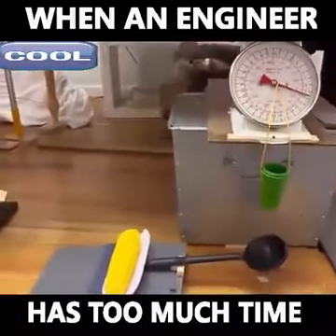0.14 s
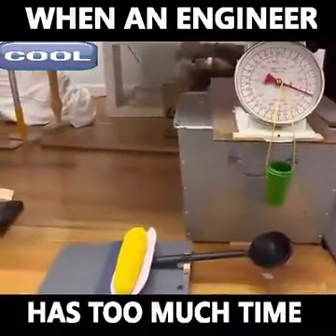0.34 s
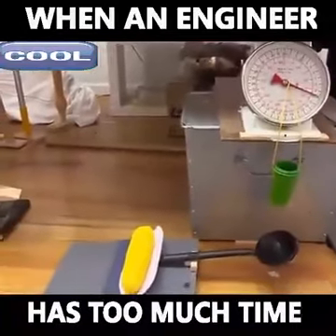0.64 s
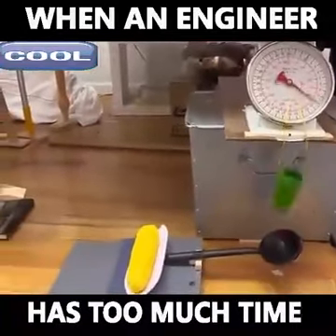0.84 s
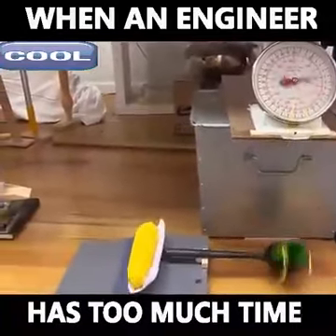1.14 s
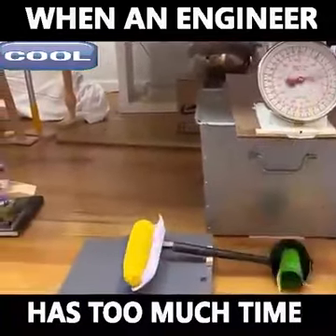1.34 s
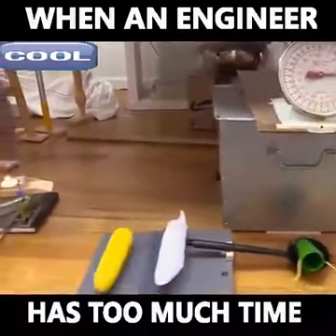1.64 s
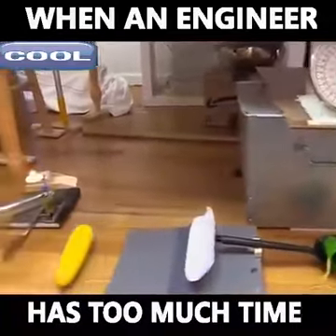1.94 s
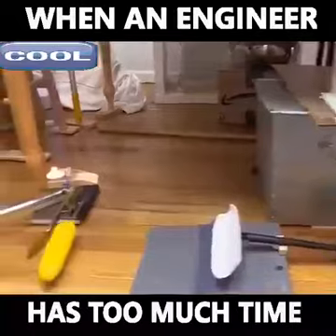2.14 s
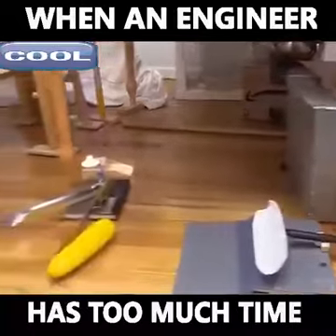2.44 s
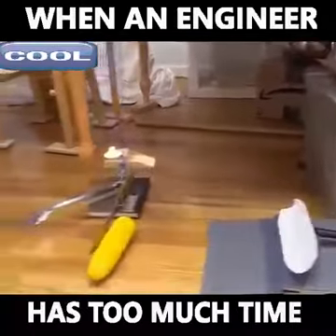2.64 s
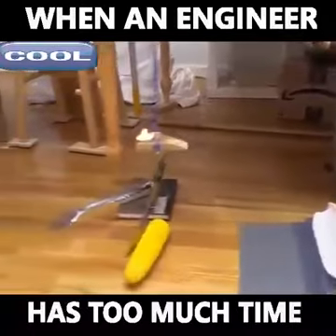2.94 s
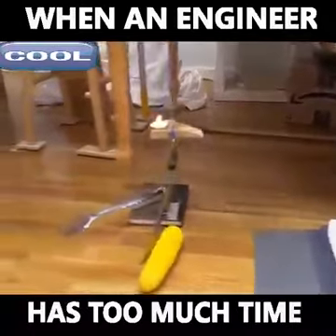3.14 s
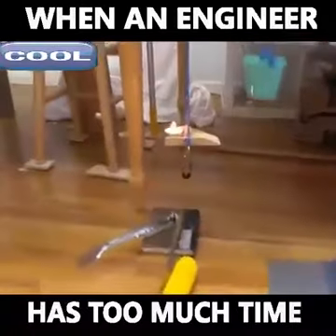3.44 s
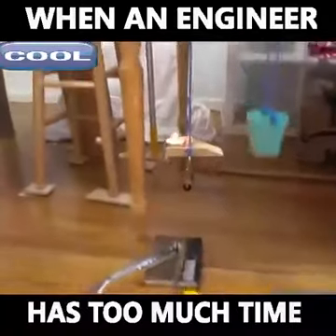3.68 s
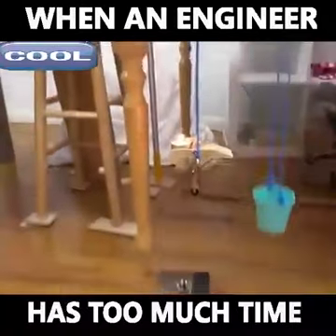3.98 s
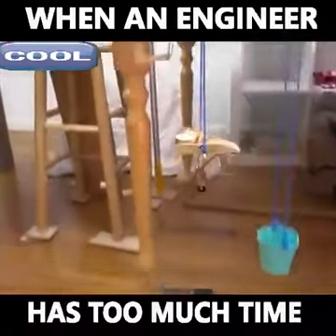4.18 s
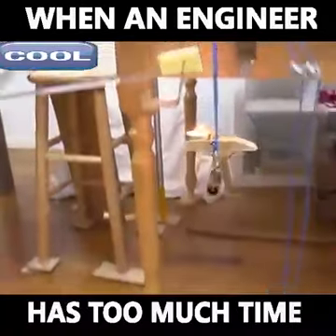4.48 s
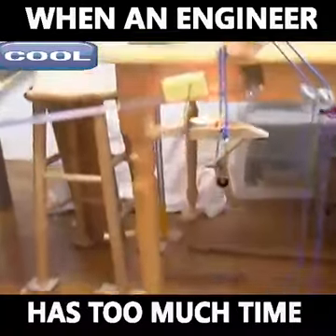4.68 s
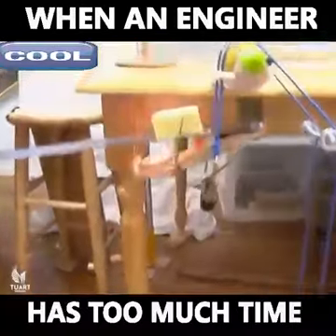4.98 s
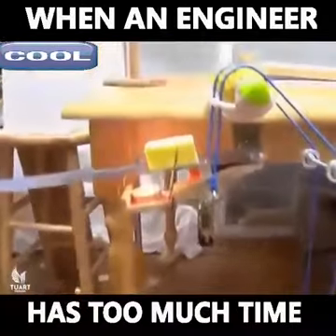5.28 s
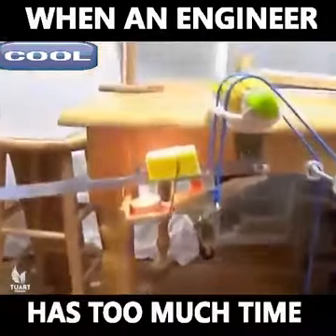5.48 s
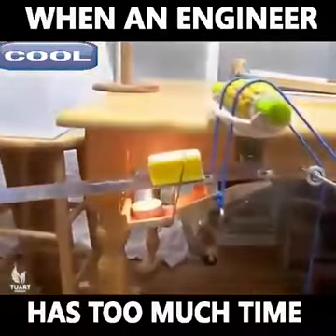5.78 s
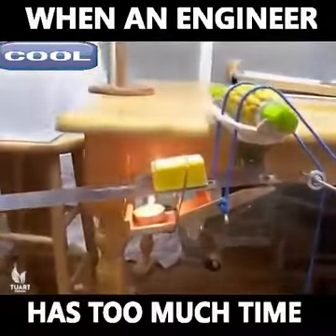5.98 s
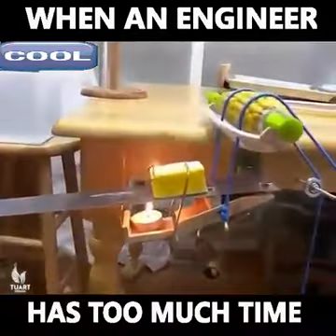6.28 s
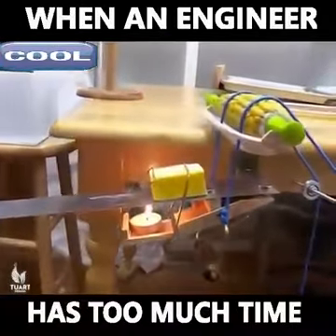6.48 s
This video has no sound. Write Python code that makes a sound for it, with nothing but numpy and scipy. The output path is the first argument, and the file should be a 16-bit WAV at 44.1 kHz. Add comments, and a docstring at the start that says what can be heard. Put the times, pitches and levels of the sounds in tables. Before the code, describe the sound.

Water trickles and glugs between sharp clatters, knocks and rolling thumps as a chain of homemade contraptions runs in a wooden-floored room.

```python
"""A wooden-floored room, where a chain of homemade contraptions runs over building rumble and faint hiss.
Water glugs and trickles into a vessel by bubble resonance; small parts tick and glass clinks. A plastic
cup drops into a ladle, a lever clatters, a corn cob rolls thumping over the boards and trips metal tongs;
later a wooden arm slams against a table. Each impact excites the damped normal modes of what it strikes."""
import sys
import numpy as np
from scipy import signal
from scipy.fft import rfft, irfft, next_fast_len
from scipy.io import wavfile

SR = 44100
rng = np.random.default_rng(int(sys.argv[2]) if len(sys.argv) > 2 else 0)


def unload_wav(signal):
    """Save mono or channel-first audio to the path in sys.argv[1] as 16-bit WAV at rate SR, clipped to [-1, 1]."""
    wavfile.write(
        sys.argv[1],
        SR,
        np.round(np.clip(np.atleast_2d(signal).T, -1, 1) * 32767).astype(np.int16),
    )


N = 291926
TIME = np.arange(N) / SR


def from_db(db):
    """Amplitude ratio of a level in decibels."""
    return 10 ** (np.asarray(db) / 20)


def unit_rms(x):
    """Normalisation to unit mean power."""
    return x / np.sqrt(np.mean(x ** 2) + 1e-20)


def in_time(rows):
    """Linear interpolation of each column at every sample."""
    times, *columns = np.transpose(rows)
    return [np.interp(TIME, times, column) for column in columns]


def at_hz(points, hz):
    """Interpolation on a logarithmic frequency axis."""
    freqs, values = np.transpose(points)
    return np.interp(np.log(np.maximum(hz, 1)), np.log(freqs), values)


def colour(x, spectrum):
    """Zero-phase filtering by a curve of f/Hz, gain/dB."""
    size = next_fast_len(x.shape[-1])
    gain = from_db(at_hz(spectrum, np.fft.rfftfreq(size, 1 / SR)))
    return irfft(rfft(x, size) * gain, size)[..., :x.shape[-1]]


def band(x, low_hz, high_hz):
    """Causal band-pass filtering."""
    return signal.sosfilt(signal.butter(2, [low_hz, high_hz], "band", fs=SR, output="sos"), x)


def ring(x, hz, t60):
    """Damped harmonic oscillator: its impulse response is a decaying unit sine."""
    r, w = from_db(-60 / (t60 * SR)), 2 * np.pi * hz / SR
    return signal.lfilter([0, np.sin(w)], [1, -2 * r * np.cos(w), r * r], x + 1e-18)


def add(track, onset, sound):
    """Superposition of a sound at an onset in seconds."""
    at = round(onset * SR)
    track[at:at + len(sound)] += sound[:max(N - at, 0)]


# the only stretch in which the ears differ: start t/s, end t/s
WIDE_SPAN = (1.25, 3.02)
# left-right difference of diffuse sound: f/Hz, gain/dB
SIDE_SPECTRUM = [(100, -42), (300, -48.5), (700, -4), (2000, -4), (8000, -3)]
def spread(side):
    """Interaural difference: a signal in antiphase at the two ears widens the sound."""
    gate = np.clip(np.minimum(TIME - WIDE_SPAN[0], WIDE_SPAN[1] - TIME) / 0.0079, 0, 1)
    return gate * colour(side, SIDE_SPECTRUM) * [[1], [-1]]


# spectral densities of rumble and hiss: f/Hz, relative level/dB
RUMBLE_SPECTRUM = [(8.8, -33.5), (15, 6.5), (33, -0.5), (54, 1.5), (64, -4.5), (130, -19.5), (170, -53.5),
                   (290, -120)]
HISS_SPECTRUM = [(53, -37.5), (90, -0.5), (318, -5), (356, -7), (392, -10), (474, -4.5), (644, -17.5),
                 (695, -13.5), (962, -15.5), (7150, -30.5), (8660, -21.5), (11300, -78.5), (19100, -120)]
# their envelopes: t/s, level/dB
RUMBLE_ENVELOPE = [(0, -40), (1.27, -44), (1.4, -55), (1.62, -45), (1.7, -68), (2.65, -77), (2.95, -57),
                   (3.1, -32), (3.21, -43), (3.34, -33), (3.45, -44), (3.85, -35), (4.0, -40.5),
                   (4.24, -36.5), (5.75, -35), (6.2, -44), (6.62, -41.5)]
HISS_ENVELOPE = [(0, -53), (.46, -56.5), (1.27, -51), (1.4, -45.5), (1.8, -34), (2.0, -49), (2.65, -40.5),
                 (2.82, -54.5), (3.2, -47.5), (3.5, -54), (6.62, -50.5)]
def room_tone():
    """Ambient noise with a continuous spectrum: building rumble, alike in both ears, and faint hiss."""
    (rumble_db,), (hiss_db,) = in_time(RUMBLE_ENVELOPE), in_time(HISS_ENVELOPE)
    rumble = unit_rms(colour(rng.standard_normal(N), RUMBLE_SPECTRUM))
    mid, side = colour(rng.standard_normal((2, N)), HISS_SPECTRUM)
    hiss = (mid + from_db(1.5) * spread(side)) / np.std(band(mid, 130, 1000))
    return from_db(rumble_db) * rumble + from_db(hiss_db) * hiss


# reverberation time of the room: f/Hz, T60/s
ROOM_DECAY = [(100, 0.39), (1000, 0.41), (4000, 0.33), (9000, 0.11)]
def reverberation(mid_send, side_send):
    """Diffuse field: dense reflections act as noise that decays exponentially in each band."""
    t = np.arange(int(.8 * SR)) / SR
    edges_hz = 60 * 2 ** np.arange(0, 9.)
    edges_hz[-1] = 12000
    noise = rng.standard_normal((2, len(t))) * (1 - np.exp(-t / 0.0023))
    response = sum(band(noise, low, high) * from_db(-60 * t / at_hz(ROOM_DECAY, np.sqrt(low * high)))
                   for low, high in zip(edges_hz, edges_hz[1:]))
    response[1] *= 1 + 8.6 * np.exp(-t / .02)   # early reflections differ most between the ears
    response /= np.linalg.norm(response, axis=1, keepdims=True)
    mid, side = signal.fftconvolve(np.array([mid_send, side_send]), response, axes=1)[:, :N]
    return mid + spread(side)


# clinks of a glass part: t/s, level/dB, f/Hz, free ringing time/s
GLASS_CLINKS = [(0.108, -46.5, 2670, 0.19), (0.232, -34.5, 2750, 0.087), (0.798, -44, 2750, 0.083),
                (1.11, -49, 2830, 0.096)]
def glass():
    """Contact damping: one mode rings freely, then dies faster once the part is touched."""
    out, t = np.zeros(N), np.arange(SR // 2) / SR
    for onset, db, hz, free_s in GLASS_CLINKS:
        decay_db = -60 * t / 0.36 - 60 * np.maximum(t - free_s, 0) / 0.14
        attack = 1 - np.exp(-t / 0.012)
        add(out, onset, from_db(db + decay_db) * attack * np.sin(2 * np.pi * hz * t))
    return out


def spiky_noise(length, uneven_db):
    """Heavy-tailed noise: each sample takes its own random gain."""
    return rng.standard_normal(length) * from_db(uneven_db * np.minimum(rng.exponential(1, length), 4))


def rattle(t60, crack, uneven_db):
    """Contact chatter: a hard burst with one sharp impulse, then a dense, uneven decay."""
    t = np.arange(SR // 3) / SR
    contacts = spiky_noise(len(t), uneven_db)
    contacts *= from_db(2.5 * np.repeat(rng.standard_normal(len(t) // 150), 150))   # small clumps
    burst, tail = 0.7 * np.exp(-t / 0.0046), .5 * from_db(-60 * t / t60)
    attack = np.minimum(t / 0.00082, 1) ** 2
    force = unit_rms(contacts) * (burst + tail) * attack
    force[round(.002 * SR)] += crack
    return force


# ticks of small parts and splashes: t/s, level/dB, f/Hz, rattle T60/s
SMALL_IMPACTS = [(0.0663, -49, 1990, 0.21), (0.086, -49, 3410, 0.14), (.24, -53.5, 1900, 0.07),
                 (0.2265, -53.5, 2890, 0.073), (0.7973, -60, 2880, 0.065), (0.823, -48.5, 3390, .05),
                 (.8738, -53.5, 4730, 0.13), (1.1057, -49.5, 2640, 0.094), (1.1277, -53.5, 3400, 0.048),
                 (1.225, -58, 6500, .06), (1.2748, -47, 1960, 0.15), (3.236, -47.5, 2650, 0.1),
                 (3.4558, -51.5, 3270, .12), (3.8425, -47.5, 3220, 0.23), (3.8595, -49, 3240, 0.12),
                 (3.933, -44.5, 3120, 0.066), (3.9574, -46, 3440, 0.061), (4.106, -44, 4180, .03),
                 (4.138, -52, 3400, .05), (4.237, -52.5, 2480, 0.24), (4.3014, -50.5, 3260, .08),
                 (4.3655, -53, 4650, 0.045), (4.447, -46, 2500, 0.27), (4.4881, -48, 2520, 0.37),
                 (4.5201, -35, 3580, 0.13), (4.5591, -45, 4300, 0.3), (4.602, -40, 2470, .05),
                 (4.6178, -49, 3180, .08), (4.7556, -48, 3480, 0.053), (4.8431, -47, 2440, 0.5),
                 (4.995, -45.5, 2470, 0.16), (5.0355, -54.5, 2320, .1), (5.3333, -38.5, 2080, 0.14),
                 (5.5254, -53, 2380, 0.075), (6.0202, -46.5, 2720, 0.04), (6.27, -53, 3530, 0.12),
                 (6.567, -55.5, 3320, 0.085)]
def ticks():
    """Forced response: a short rattle drives one heavily damped, hence broad, resonance."""
    out = np.zeros(N)
    for onset, db, hz, t60 in SMALL_IMPACTS:
        force = rattle(t60, crack=1.8, uneven_db=-6.5)[:SR // 4]
        add(out, onset, from_db(db) * (ring(force, hz, t60=0.007) + band(force, 1600, 8500)))
    return out


def bubble(hz, t60, rise):
    """Bubble resonance: trapped air pulsates, its pitch climbing as it nears the surface."""
    t = np.arange(int(.15 * SR)) / SR
    attack = 1 - np.exp(-t / 0.00078)
    return np.sin(2 * np.pi * hz * t * (1 + rise * t)) * from_db(-60 * t / t60) * attack


def spray():
    """Random excitation: clumps of droplets drive broad resonances, and the vessel wall sings faintly."""
    drops = spiky_noise(N, uneven_db=1.2)
    clump_times = np.linspace(0, TIME[-1], N // 500)
    drops *= from_db(4.5 * np.interp(TIME, clump_times, rng.standard_normal(N // 500)))
    fizz = (ring(drops, 3220, 0.0033) + 0.82 * ring(drops, 2160, 0.0048)
            + 0.67 * ring(drops, 3980, 0.0026) + 0.067 * ring(drops, 6500, 0.00057))
    wall = 0.19 * ring(drops, 1369, 0.09)
    return unit_rms(fizz + wall)


# one envelope for each pour: t/s, bubble level/dB, spray level/dB
POURS = [
    [(.72, -48, -43), (.8, -54, -61), (1.3, -46, -51)],
    [(3.02, -43, -38), (3.2, -50, -59), (3.62, -53.5, -51.5), (4.52, -46.5, -52), (4.8, -59.5, -51.5),
     (5.04, -41, -46.5), (5.12, -57, -41)],
    [(5.35, -48, -54), (5.67, -55, -63.5), (6.02, -47, -54.5), (6.17, -54, -61), (6.62, -57, -78)],
]
# air column above the water, falling in the first pour, rising as the second vessel fills: t/s, f/Hz
COLUMN_RESONANCE = [(.72, 1106), (1.3, 854), (3.02, 885), (3.7, 1069), (5.0, 1200), (6.62, 1284)]
def trickle():
    """Air-column resonance: small bubbles cluster round the vessel's pitch, under a fine spray."""
    out, bubbles_per_s = np.zeros(N), 150
    (column_hz,) = in_time(COLUMN_RESONANCE)
    for pour in POURS:
        bubbles_db, spray_db = in_time(pour)
        start, end = pour[0][0], pour[-1][0]
        flowing = np.clip(np.minimum(TIME - start, end + 0.12 - TIME) / .03, 0, 1)
        births = np.sort(rng.uniform(start, end, int(bubbles_per_s * (end - start))))
        bubbles = np.zeros(N)
        for onset in births:
            detune, strength = rng.standard_normal(2)
            hz = np.interp(onset, TIME, column_hz) * np.exp(0.127 * detune)
            add(bubbles, onset, from_db(6.5 * strength) * bubble(hz, t60=0.075, rise=2.5))
        bubbles /= np.sqrt(np.sum(bubbles ** 2) / np.sum(flowing))   # unit power over the pour
        out += from_db(bubbles_db) * bubbles + flowing * from_db(spray_db) * spray()
    return out


# large single bubbles: t/s, level/dB, starting f/Hz
LARGE_BUBBLES = [(0.072, -35.5, 996), (.098, -29.5, 990), (.819, -30, 1077), (.957, -31, 1085),
                 (1.12, -24, 920), (1.153, -30, 893), (1.233, -31.5, 782), (1.263, -33, 854),
                 (3.089, -23, 989), (3.241, -30, 817), (3.301, -27.5, 804), (3.382, -35.5, 1217),
                 (3.462, -32.5, 852), (3.475, -26.5, 927), (3.561, -33, 750), (3.613, -28, 1066),
                 (3.631, -18.5, 1026), (3.648, -18.5, 1140), (3.67, -26, 1024), (3.861, -27.5, 997),
                 (3.955, -24, 1098), (3.967, -23.5, 1120), (4.108, -31, 1060), (4.242, -30.5, 892),
                 (4.297, -23, 1087), (4.343, -30, 1130), (4.367, -35, 1150), (4.443, -23.5, 1087),
                 (4.592, -19.5, 1118), (4.61, -29, 1122), (4.676, -21, 1129), (4.688, -25, 1195),
                 (4.953, -22, 1106), (5.506, -34.5, 1200), (5.533, -26.5, 1154), (5.833, -32.5, 1200),
                 (5.873, -35.5, 1166), (5.979, -38, 1170), (6.119, -29.5, 1137), (6.21, -29.5, 1246),
                 (6.269, -25, 1278), (6.335, -37, 1342), (6.41, -32.5, 1287), (6.568, -25, 1252),
                 (6.603, -25, 1340)]
def glugs():
    """Free oscillation: each large bubble sounds one short, rising note."""
    out = np.zeros(N)
    for onset, db, hz in LARGE_BUBBLES:
        add(out, onset, from_db(db) * bubble(hz, t60=0.066, rise=0.91))
    return out


# starts of a short pattern of rolling thumps, heard twice: t/s
PATTERN_STARTS = (2.166, 2.364)
# thumps within that pattern: t/s from its start, level/dB, f/Hz
PATTERN_THUMPS = [(0, -16.5, 214), (.03, -14, 197.4), (0.058, -14.5, 165), (.072, -15.5, 157.6),
                  (0.099, -15.5, 130), (.14, -19, 121), (.168, -23.5, 132)]
# single bumps on the boards: t/s, level/dB, f/Hz
BOARD_BUMPS = [(1.33, -4, 490), (1.362, -24, 255), (1.49, -6, 480), (1.593, -8, 296), (1.607, -4.5, 213),
               (1.649, -18.5, 333), (1.819, -16, 255), (1.937, -32, 249), (2.055, -16.5, 131),
               (2.086, -13, 204), (2.103, -17.5, 122.5), (2.126, -16, 136.4), (2.636, -21, 145),
               (2.656, -20.5, 114), (2.689, -4.5, 466), (3.043, -13, 251), (3.12, -23.5, 268),
               (3.182, -22.5, 212), (3.248, -26.5, 190), (3.478, -25, 252), (4.283, -24.5, 266),
               (4.611, -28.5, 243), (5.164, -8, 148), (5.189, -15.5, 148), (5.697, -26, 148),
               (6.39, -18, 161), (6.419, -16.5, 247), (6.444, -21.5, 240)]
def floorboards():
    """Constant-Q damping: soft contacts ring the boards for the same few cycles at any pitch."""
    out, t = np.zeros(N), np.arange(SR // 5) / SR
    attack, t60_cycles = 1 - np.exp(-t / 0.0045), 10.7
    rolling = [(start + delay, db, hz) for start in PATTERN_STARTS for delay, db, hz in PATTERN_THUMPS]
    for onset, db, hz in rolling + BOARD_BUMPS:
        modes = np.sin(2 * np.pi * hz * t) + 0.18 * np.sin(3.3 * np.pi * hz * t)
        add(out, onset, from_db(db - 60 * t * hz / t60_cycles) * modes * attack)
    return out


def loose_parts(t60):
    """Cavity resonance: loose parts meet differently each time, so their rattle rings other hollows."""
    force = rattle(t60, crack=0.94, uneven_db=3.5)
    hollows = sum(ring(force, hz, t60=0.069) for hz in 200 * 2 ** rng.uniform(0, 5, 24))
    return force + 0.63 * hollows * np.std(force) / np.std(hollows)


# modes of metal lever and ladle, tongs and base, wooden arm and table: f/Hz, level/dB, T60/s
LEVER_MODES = [(200, -3, .2), (295, -4, .2), (474, -6, .15), (723, -6, .15), (795, -4, .2), (850, -5, .2),
               (931, -6, .2), (1093, -5, .2), (1180, -6, .2), (1707, -8, .15), (2191, -10, .15),
               (2514, -10, .15), (2821, -8, .2), (2950, -9, .2), (6718, -23, .4), (7407, -27, .35),
               (7851, -32, .3)]
TONGS_MODES = [(281, -7, 0.11), (467, -1, 0.14), (1200, -16, .08), (1660, 0, 0.066), (2560, -5.5, 0.055)]
ARM_MODES = [(148, -1.5, 0.22), (800, -22, 0.069), (940, 0.5, 0.46), (975, 1, 0.44), (987, -4, 0.33),
             (1107, -1.5, 0.34), (1530, 6, 0.13), (1750, -19, .15), (1896, -12.5, 0.47), (2440, -10, 0.31),
             (3440, -10.5, 0.28)]
# lever, tongs, arm: thud level/dB re knock, crack level/dB re clack, ring level/dB re the louder one
PART_LEVELS = [(-5, -7, -13.5), (5, -4.5, -8), (-12, -9.5, -11)]
# bands of clack, thud, knock and crack: lower f/Hz, upper f/Hz
IMPACT_BANDS = ((1500, 3800), (120, 500), (500, 1500), (3800, 9500))
# parts crashing together: t/s, clack level/dB, knock level/dB, rattle T60/s
COLLISIONS = [(1.3256, -11, -37.5, 0.36), (1.3434, -18.5, -26.5, 1), (1.3638, -28, -21, 0.28),
              (1.4866, -12, -20, 0.13), (1.5336, -24, -30.5, 1), (1.59, -13, -15, 0.54),
              (1.6498, -15, -21.5, 0.28), (1.6985, -34, -31, 0.13), (1.781, -37, -19, 0.13),
              (1.7873, -11.5, -12, 0.17), (1.798, -16.5, -32.5, 0.2), (1.82, -18.5, -20, 0.59),
              (1.842, -17.5, -17, 0.27), (1.882, -15.5, -19.5, 0.19), (1.937, -19.5, -27.5, 0.11),
              (1.9519, -30, -38, .083), (2.5593, -24.5, -29, 0.36), (2.6055, -32.5, -39, 0.32),
              (2.6416, -36.5, -44.5, .75), (2.695, -36.5, -39.5, 0.17), (3.0232, -45.5, -40, 0.79),
              (3.0731, -44, -41.5, 0.068), (5.1373, -7, -28, 0.1), (5.1501, -41, -17, 0.19),
              (5.1787, -24, -17, 0.25), (5.2254, -23, -23, 0.16), (5.249, -25, -49, 0.16),
              (5.3132, -23, -34, 0.061)]
def crashes():
    """Impact excitation: a blow shakes wood and plastic broadly and rings the struck part's modes."""
    broad, ringing, t = np.zeros(N), np.zeros(N), np.arange(SR // 3) / SR
    impulse = np.arange(SR // 2) == 0
    tongs_from_s, arm_from_s = 2.3, 4
    for onset, clack_db, knock_db, t60 in COLLISIONS:
        part = (onset > tongs_from_s) + (onset > arm_from_s)
        modes = (LEVER_MODES, TONGS_MODES, ARM_MODES)[part]
        thud_db, crack_db, ring_db = PART_LEVELS[part]
        shake = loose_parts(t60)
        bands_db = (clack_db, knock_db + thud_db, knock_db, clack_db + crack_db)
        for db, (low, high) in zip(bands_db, IMPACT_BANDS):
            damped = shake * np.exp(-t * low * 0.0012)   # higher vibrations are lost sooner
            bandwidth_gain = np.sqrt(SR / 2 / (high - low))
            add(broad, onset, from_db(db) * bandwidth_gain * band(damped, low, high))
        strengths = from_db(rng.normal(0, 2.5, len(modes))) * rng.choice([-1, 1], len(modes))
        strengths *= from_db(max(clack_db, knock_db) + ring_db)
        for (hz, db, mode_t60), strength in zip(modes, strengths):
            add(ringing, onset + 0.002018, from_db(db) * strength * ring(impulse, hz, mode_t60))
    # colour of the broadband part: f/Hz, gain/dB
    tilt = [(70, -7.5), (140, -10), (1000, 5), (1800, 8), (3500, -2), (5000, 13.5), (9000, 0.5)]
    return colour(broad, tilt) + ringing


def scene():
    """Superposition of direct sound, reverberant field and ambient noise."""
    crash, water, ticking, boards = crashes(), glugs() + trickle(), ticks(), floorboards()
    direct = crash + water + ticking + boards + glass()
    send = from_db(-12.5) * crash + from_db(-5) * water + from_db(-6) * ticking + from_db(-5.5) * boards
    return direct + reverberation(send, side_send=from_db(-7.5) * crash) + room_tone()


def record(dry):
    """Soft saturation rounds the peaks; a steep low-pass limits the bandwidth."""
    stopband_hz = 9050
    lowpass = signal.cheby2(16, 70, stopband_hz, fs=SR, output="sos")
    return signal.sosfilt(lowpass, 1.223 * np.tanh(dry / 1.355))


dry = scene()
out = record(dry)
unload_wav(out)
```